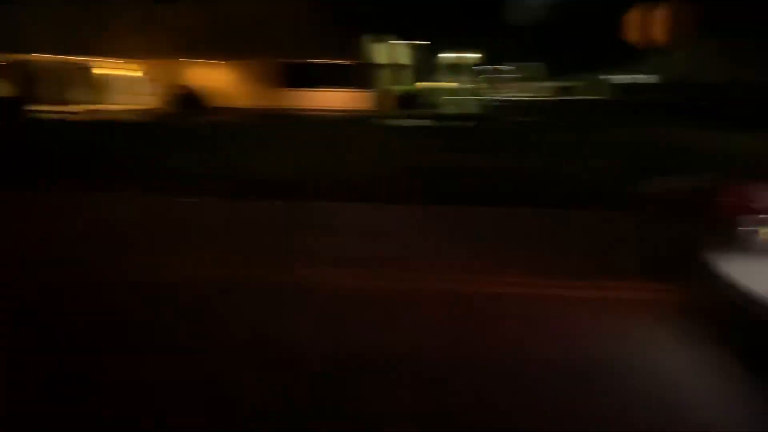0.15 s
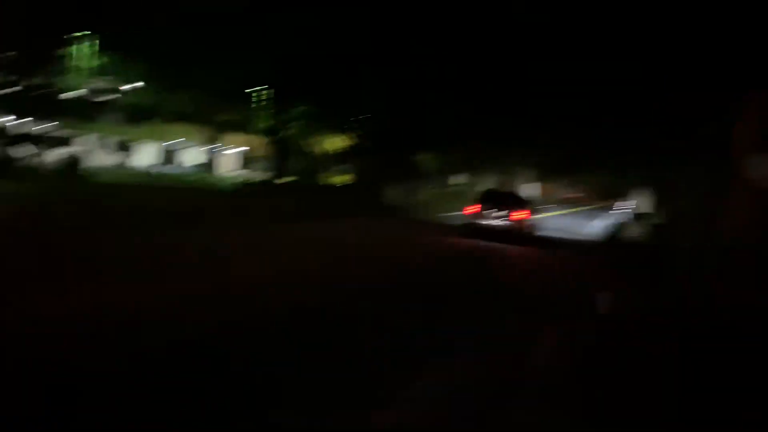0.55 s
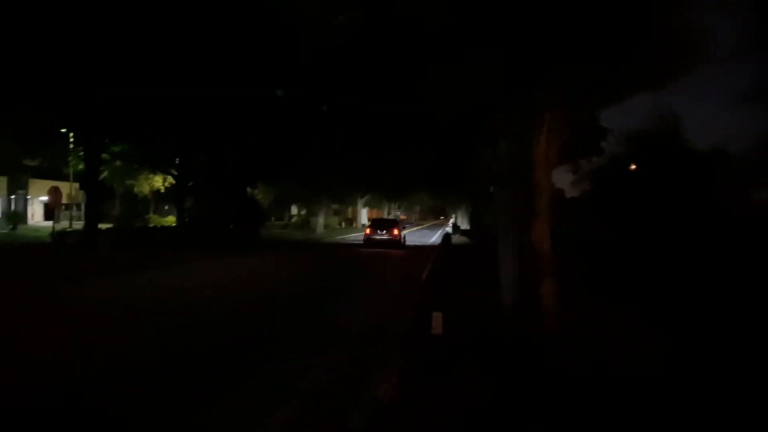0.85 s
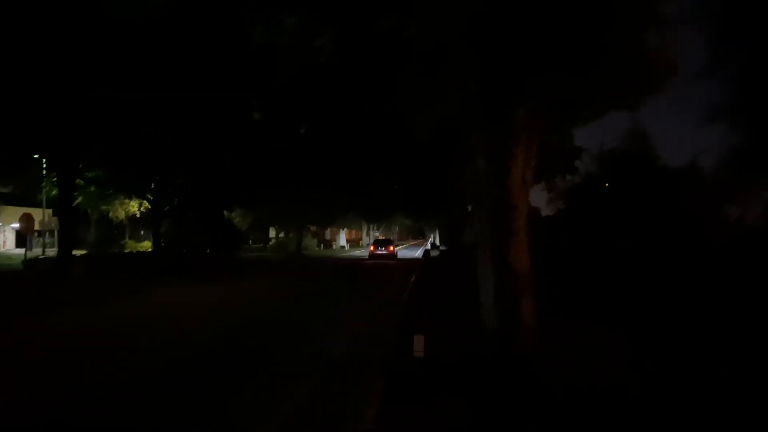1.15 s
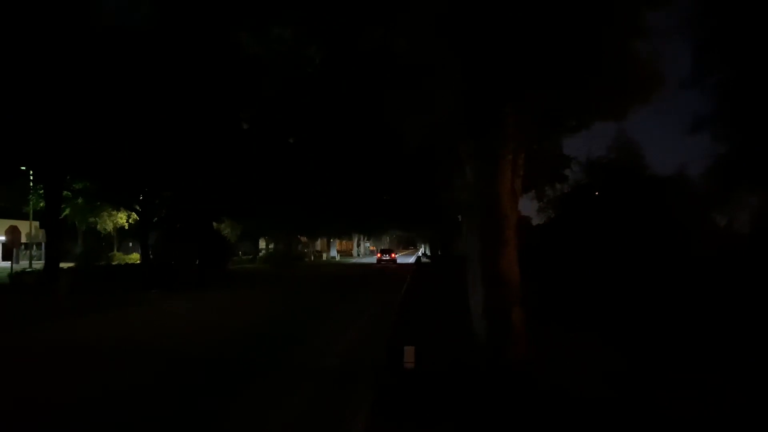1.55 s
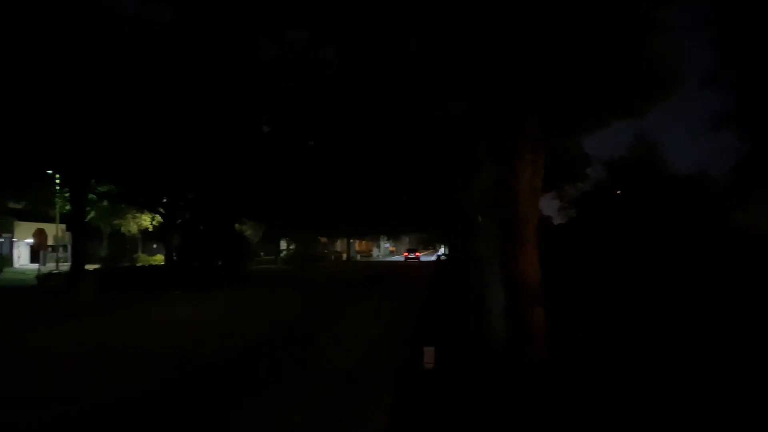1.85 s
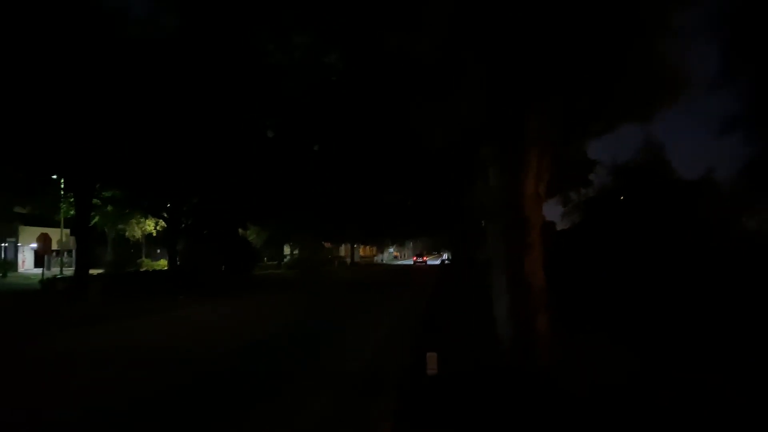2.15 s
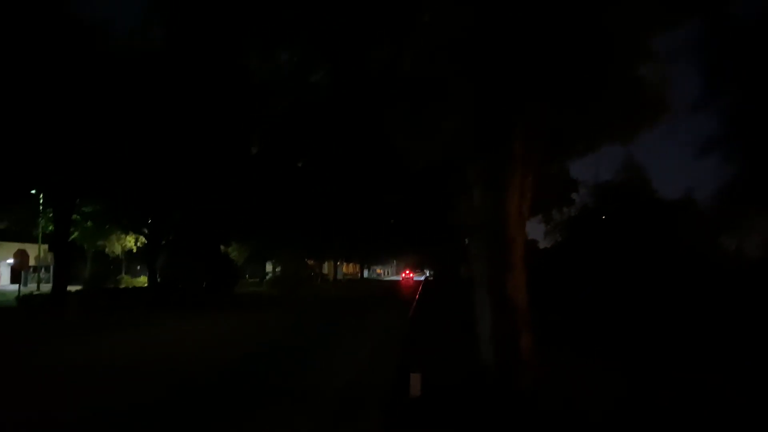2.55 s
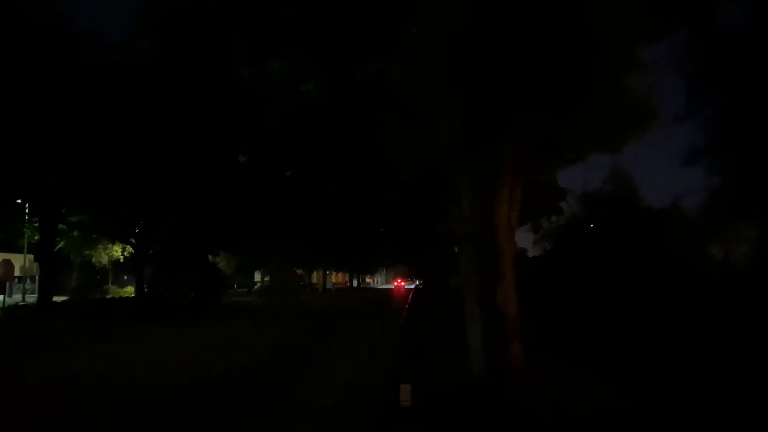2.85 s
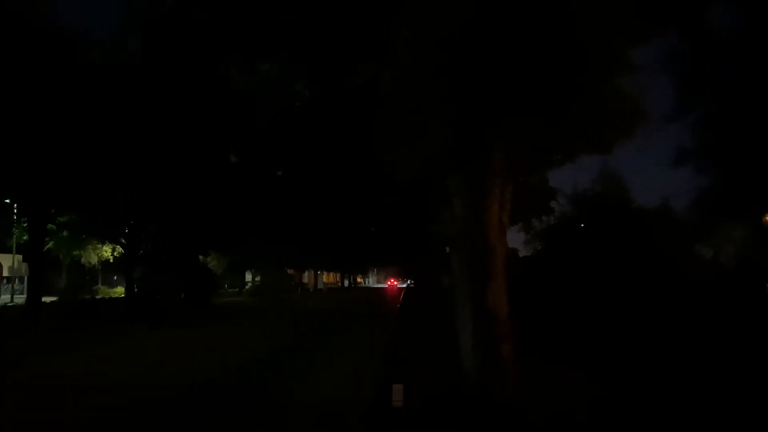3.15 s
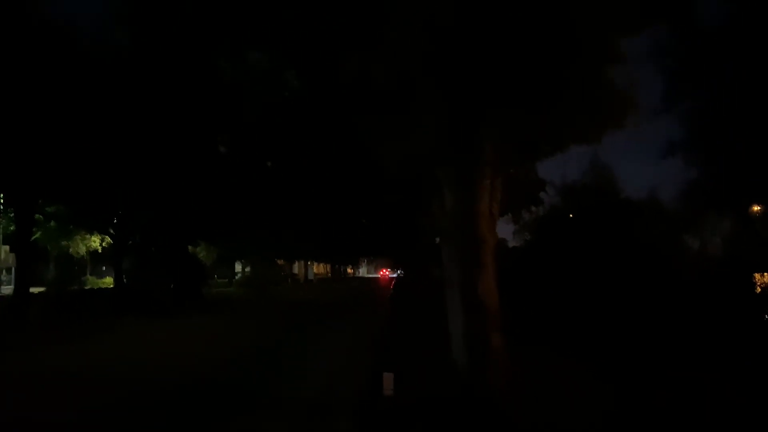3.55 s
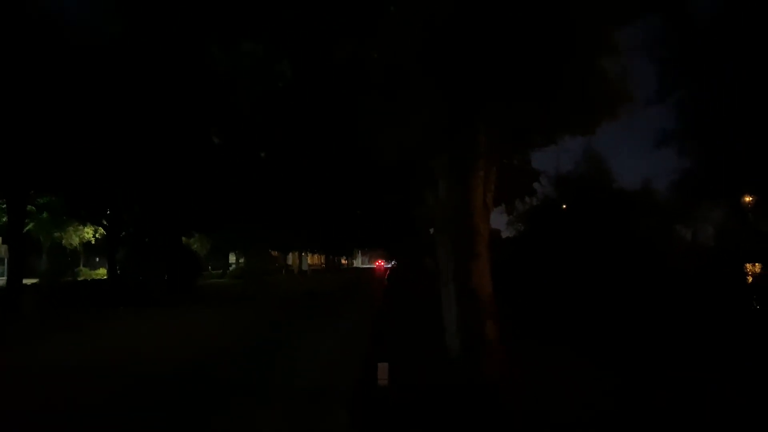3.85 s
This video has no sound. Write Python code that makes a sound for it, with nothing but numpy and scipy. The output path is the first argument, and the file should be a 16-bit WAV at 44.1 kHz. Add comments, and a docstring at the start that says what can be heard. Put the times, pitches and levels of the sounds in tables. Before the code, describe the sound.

Loud exhaust bark and drone burst past the listener at once, echo off house fronts, drop in pitch and pull away, then fall suddenly quieter as the driver lifts off, leaving distant hum outdoors.

```python
"""A four-cylinder car with a loud exhaust roars close past on a night road and drives off; the driver lifts off
the throttle twice. Harmonics of the firing rate make its drone, pulses through a resonant pipe its bark, and
noise gated by the firings its rasp, sizzle and crack. One cylinder barks harder than the others.
The road and house fronts answer with delayed copies and decaying noise. Shaped noise makes far traffic and the
car's wake; a wavering sine that swells and fades makes the cricket, another a faint far hum."""
import sys
import numpy as np
from scipy import signal
from scipy.fft import rfft, irfft, next_fast_len
from scipy.io import wavfile
from scipy.ndimage import uniform_filter1d, map_coordinates

SR = 44100
rng = np.random.default_rng(int(sys.argv[2]) if len(sys.argv) > 2 else 0)


def generate_wav(signal):
    """Clip the signal to [-1, 1] and save it as 16-bit WAV at the path in sys.argv[1]."""
    frames = np.transpose(np.atleast_2d(signal))
    scaled = np.clip(frames, -1, 1) * 32767
    pcm = np.round(scaled).astype(np.int16)
    wavfile.write(sys.argv[1], SR, pcm)


def gain_from_db(level_db):
    """Convert decibel levels to linear amplitude factors (20 dB per decade)."""
    decades = np.asarray(level_db, float) / 20
    return 10 ** decades


N = 176400
TIME_S = np.arange(N) / SR


def unit(x):
    """Normalisation to an rms of 1."""
    return x / np.sqrt(np.mean(x ** 2) + 1e-20)


def along(points, hz):
    """Spectral interpolation of (frequency, value) points on a logarithmic axis."""
    f, value = np.transpose(points)
    return np.interp(np.log(hz + 1), np.log(f + 1), value)


def curves(rows):
    """Linear interpolation in time: one value per sample for each column after the time."""
    seconds, *columns = np.transpose(rows)
    return [np.interp(TIME_S, seconds, column) for column in columns]


def wobble(rate):
    """Slow random modulation: a smooth curve through random knots, rate of them a second."""
    knots = rng.standard_normal(int(N * rate / SR) + 4)
    return map_coordinates(knots, [np.arange(N) * rate / SR])


def filtered(x, response):
    """Linear filtering: the spectrum of x times a complex response of frequency."""
    m = 2 * next_fast_len(N // 2 + SR // 4)
    return irfft(rfft(x, m) * response(np.fft.rfftfreq(m, 1 / SR)), m)[..., :N]


def causal(spectrum):
    """Minimum phase: folding the cepstrum forward lets a resonance ring only after its pulse."""
    def response(hz):
        cepstrum = irfft(np.log(gain_from_db(along(spectrum, hz)) + 1e-4))
        half = len(cepstrum) // 2
        cepstrum[1:half] *= 2
        cepstrum[half + 1:] = 0
        return np.exp(rfft(cepstrum))
    return response


def late(x, seconds):
    """Propagation delay: x heard later by a time that may change."""
    return map_coordinates(x, [np.arange(N) - seconds * SR], order=3, mode="nearest")


def rush(spectrum, patchy_db, gate=1):
    """Turbulent noise of rms 1: a shaped stereo spectrum with random patches in time and frequency."""
    # Likeness of left and right: (frequency [Hz], correlation [-1 to 1])
    alike = [(60, 0.92), (180, 0.94), (550, -0.61), (1650, 0.22), (4970, 0.028), (15000, -0.22)]
    z = signal.stft(gate * rng.standard_normal((2, N)), nperseg=512)[2]
    field = uniform_filter1d(rng.standard_normal(z.shape[1:]), size=3, axis=0)
    field = uniform_filter1d(field, size=14, axis=1)
    pair = signal.istft(z * gain_from_db(patchy_db * unit(field)), nperseg=512)[1][:, :N]

    def mid_side(hz):
        turn = np.arccos(np.clip(along(alike, hz), -1, 1)) / 2
        return gain_from_db(along(spectrum, hz)) * [np.cos(turn), np.sin(turn)]

    mid, side = filtered(pair, mid_side)
    return unit(np.array([mid + side, mid - side]))


def far_traffic():
    """Broadband noise: the far traffic is a steady, coloured hum."""
    # Colour of the far hum: (frequency [Hz], level [dB per Hz])
    night_spectrum = [(65, -28.5), (110, -4), (147, -3.5), (184, -10), (419, -15), (474, -4), (582, -20.5),
                      (658, -8.5), (1270, -22.5), (2670, -24.5), (7450, -53), (15000, -91)]
    return gain_from_db(-48.5 + 0.31 * wobble(4.4)) * rush(night_spectrum, patchy_db=1.5)


def wake():
    """Low-frequency turbulence: a deep rumble, first the car's wake, then far traffic."""
    # Strength of the rumble: (time [s], level [dB])
    wake_level = [(0.0, -48), (0.03, -58), (0.32, -47), (2.74, -52), (4.0, -46.5)]
    # Colour of the rumble: (frequency [Hz], level [dB per Hz])
    wake_spectrum = [(15, -62.5), (25, -24), (54, -0.5), (95, 4), (120, -16), (160, -25.5), (260, -120)]
    return gain_from_db(curves(wake_level)[0] + 1.5 * wobble(6.17)) * rush(wake_spectrum, patchy_db=0.0)


def cricket():
    """Amplitude modulation: half-sine swells cut chirps from a high tone of wavering phase."""
    # Chirps: (start [s], length [s], level [dB, relative])
    chirps = [(3.108, 0.017, -89), (3.377, 0.025, -86), (3.594, 0.03, -86), (3.633, 0.036, -84),
              (3.833, 0.1, -89.5)]
    chirp_gain_db, tone_hz = 9.5, 7300  # chirp_gain_db: loudness of all the chirps
    swell = sum(gain_from_db(db + chirp_gain_db) * np.sin(np.pi * np.clip((TIME_S - start) / length, 0, 1))
                for start, length, db in chirps)
    return swell * np.sin(2 * np.pi * tone_hz * TIME_S + 1.4 * wobble(40))


def far_hum():
    """Narrow-band tone: slow random level and phase blur a faint sine that comes in late."""
    start_s, tone_hz, level_db = 3.46, 482, -62
    level = gain_from_db(level_db + 2.4 * wobble(5.47)) * np.clip((TIME_S - start_s) / .15, 0, 1)
    return level * np.sin(2 * np.pi * tone_hz * TIME_S + 0.67 * wobble(12))


def night():
    """Superposition of the independent sounds around the road."""
    hum = far_traffic()
    rumble = wake()
    chirping = cricket()
    return hum + far_hum() + rumble + chirping


def street(x):
    """Diffuse reverberation: each frequency of the houses' answer dies at its own speed."""
    # Decay of the street: (frequency [Hz], time to fall by 60 dB [s])
    street_decay = [(150, 0.5), (1000, 0.34), (8000, 0.18)]
    shared = 0.24  # each side's share of the other's tail
    hz, t, z = signal.stft(rng.standard_normal((2, SR // 2)), SR, nperseg=256)
    z = z * gain_from_db(-60 * t / along(street_decay, hz)[:, None])
    tail = signal.istft(z, SR, nperseg=256)[1]
    answer = (tail + shared * tail[::-1]) / np.linalg.norm(tail[0])
    delayed = np.pad(x, (600, 0))[None]  # samples before the first answer
    return signal.fftconvolve(delayed, answer, axes=1)[:, :N]


def firings(count_up, sizes):
    """Impulse train: one pulse each time the running count of firings passes a whole number."""
    jitter_s, scatter_db = .00006, 0.9
    k = np.arange(np.ceil(count_up[0]), count_up[-1] - 1)
    luck = rng.standard_normal((len(k), 2))
    at = np.interp(k, count_up, np.arange(N)) + jitter_s * SR * luck[:, 0] + 1
    size = np.array(sizes)[k.astype(int) % 4] * gain_from_db(scatter_db * luck[:, 1])
    # a pulse between two samples is split over both
    i = np.clip(at.astype(int), 0, N - 2)
    return np.bincount(i, size * (1 - at + i), N) + np.bincount(i + 1, size * (at - i), N)


def engine_drone(count_up, levels_db):
    """Harmonic series: the regular firing sounds as multiples of its rate, each wavering in level."""
    # Harmonics: (multiple of the firing rate, phase after the firing [rad])
    harmonics = [(1, 0), (2, .9), (3, .6), (4, .6)]
    # Partials that sing out for a while: (multiple of the firing rate, start [s], end [s], rms level at the top [dB])
    overtones = [(7.75, 1.28, 1.577, -41), (2.75, 0.74, 3.92, -59), (4.75, 0, 0.14, -21),
                 (4.75, .2, 1.62, -37.5)]
    waver_db, rough_db = 0.82, 1  # slow wavering; quick flutter
    tone = 0
    for db, (k, rad) in zip(levels_db, harmonics):
        level = np.sqrt(2) * gain_from_db(db + waver_db * wobble(7.34) + rough_db * wobble(35))
        tone = tone + level * np.cos(2 * np.pi * k * count_up - rad)
    for k, start, end, db in overtones:
        swell = np.sqrt(np.abs(np.sin(np.pi * np.clip((TIME_S - start) / (end - start), 0, 1))))
        level = np.sqrt(2) * gain_from_db(db + 2.8 * wobble(6.56)) * swell
        # whole quarters of the firing rate: harmonics of the four-firing cycle
        tone = tone + level * np.cos(np.pi / 2 * round(4 * k) * count_up + 0.23 * wobble(25))
    return tone


def exhaust_bark(rate, count_up, pulses, hard, low_db, high_db):
    """Resonant dispersion: the pipe rings at each blow and lets the lows out later than the highs."""
    # Resonances of the pipe: (frequency [Hz], level [dB per Hz])
    pipe_spectrum = [(30, -26.5), (100, -29.5), (185, -13), (250, -11), (400, -11.5), (480, -6.5),
                     (560, -11.5), (700, -8), (810, -10.5), (950, -20), (1140, -15), (1350, -22.5),
                     (2200, -37.5), (3500, -65.5), (6000, -120)]
    cruise_hz, shared_below_hz = 147, 510  # firing rate once the car recedes; top of the shared part
    split_hz, chirp_s = 372, 0.00263  # low bark below, high bark above; lateness of the lowest lows
    even_share, even_until_s = 0.25, 0.12
    fade_s, fade_db_per_s = 3.4, 21

    # below shared_below_hz, what all cylinders share is the drone
    even = firings(count_up, np.ones(4) / 4)
    excess = hard - filtered(even, lambda f: 1 / (1 + (f / shared_below_hz) ** 8))
    # seen from the front, all cylinders bark
    blows = excess + even_share * pulses / (1 + (TIME_S / even_until_s) ** 6)

    def pipe(x, shift):
        def response(f):
            dispersion = np.exp(-2j * np.pi * chirp_s * split_hz * np.log(1 + f / split_hz))
            return causal(pipe_spectrum)(f / shift) * dispersion
        return filtered(x, response)

    # the approach raises the pipe's resonances too
    coming = np.clip((rate - cruise_hz) / (rate[0] - cruise_hz), 0, 1)
    bark = pipe(blows * coming, rate[0] / cruise_hz) + pipe(blows * (1 - coming), 0.98)
    low = filtered(bark, lambda f: 1 / (1 + (f / split_hz) ** 6))
    bark = gain_from_db(low_db) * unit(low) + gain_from_db(high_db) * unit(bark - low)
    # from fade_s the bark dies away and leaves the drone
    return bark * gain_from_db(-fade_db_per_s * np.clip(TIME_S - fade_s, 0, 1))


def exhaust_noise(pulses, hard, rasp_db, sizzle_db):
    """Modulated turbulence: every firing puffs noise, and the hard cylinder adds a sharp crack."""
    # Colours of the rasp, the sizzle above it and the crack: (frequency [Hz], level [dB per Hz])
    rasp_spectrum = [(530, -30.5), (900, -3.5), (1060, -11), (1320, 0), (1590, -6.5), (1760, -3.5),
                     (2000, -10.5), (2500, -9.5), (2840, -13.5), (3600, -20), (4680, -38), (7920, -120)]
    sizzle_spectrum = [(1470, -32), (2500, -14), (4420, -11.5), (6430, -18), (7470, -27.5), (10100, -27.5),
                       (12200, -42), (13500, -29.5), (15000, -41)]
    crack_spectrum = [(1200, -7.5), (2500, -2.5), (3400, -13.5), (4700, -8.5), (6500, -25), (10000, -29),
                      (15000, -42.5)]
    # Crack, strongest while the tail pipe points at the listener: (time [s], level [dB])
    crack_level = [(.1, -38.5), (.19, -36.5), (.22, -23.5), (.3, -38), (.42, -42.5), (.8, -100)]
    puff_s, crack_s = 0.0013, 0.00061  # time constants
    rasp_gated, sizzle_gated = 0.25, 0.23  # share of the gate that follows the puffs
    puffs = unit(filtered(pulses, lambda f: 1 / (1 + 2j * np.pi * f * puff_s) ** 2))
    rasp = rush(rasp_spectrum, 3.6, 1 - rasp_gated + rasp_gated * puffs)
    sizzle = rush(sizzle_spectrum, 2.6, 1 - sizzle_gated + sizzle_gated * puffs)
    snap = unit(filtered(hard, lambda f: 1 / (1 + 2j * np.pi * f * crack_s) ** 2))
    crack = rush(crack_spectrum, 1.9, snap)
    return gain_from_db(rasp_db) * rasp + gain_from_db(sizzle_db) * sizzle + gain_from_db(curves(crack_level)[0]) * crack


def reflections(point, gone, nearest_m, metres):
    """Image sources: the road and the house fronts return copies, late by their longer paths."""
    # Fronts along the road: (distance from the lane [m], negative on the listener's side, level [dB])
    walls = [(6.5, -8.5), (-9.5, -14.5)]
    pipe_height_m, ear_height_m, ground = 0.335, 1.54, 0.34  # ground: reflection factor of the road
    echoes = ground * late(point, 2 * pipe_height_m * ear_height_m / metres / 343)
    for wall, db in walls:
        path = np.hypot(2 * abs(wall) + np.sign(wall) * nearest_m, gone)
        echoes = echoes + gain_from_db(db) * metres / path * late(point, (path - metres) / 343)
    return echoes


def car():
    """A compact source in motion: drone, bark with echoes, and noise that spreads out with distance."""
    # Firings as heard, the fall of pitch in passing included: (time [s], rate [firings per second])
    firing_rate = [(0, 174.6), (.08, 171.6), (.12, 166), (.18, 154), (.23, 148.9), (.32, 146.1),
                   (.45, 145.6), (.7, 146.4), (1.46, 149.4), (1.6, 142.6), (1.67, 144), (1.73, 149.2),
                   (1.95, 146.8), (2.5, 145.1), (3.3, 140.8), (3.6, 138), (4, 137)]
    # Levels in three parts, passing, pulling away, coasting: (time [s], drone at 1, 2, 3 and 4 times
    # the firing rate [dB], low bark [dB], high bark [dB], rasp [dB], sizzle [dB])
    car_levels = [
        [(0.0, -19, -20.5, -25.5, -30, -25.5, -17.5, -18, -25),
         (0.08, -22, -20, -25.5, -25.5, -23.5, -22.5, -40, -39),
         (0.13, -17.5, -21, -17.5, -23.5, -25.5, -22, -17.5, -34.5),
         (0.2, -24.5, -20, -20.5, -36, -31, -17, -30, -37.5),
         (0.26, -23.5, -23, -20, -46, -28, -20.5, -49, -40),
         (0.45, -28.5, -30.5, -23, -49, -38, -29.5, -34.5, -50.5)],
        [(0.64, -25.5, -30, -31, -30.5, -36, -31, -36.5, -47),
         (0.82, -26.5, -32.5, -39, -34, -36.5, -37.5, -37, -48.5),
         (1.02, -28.5, -34.5, -36.5, -42, -38, -37.5, -39, -50.5),
         (1.46, -31.5, -31.5, -32, -31.5, -38, -36.5, -40.5, -53),
         (1.57, -28.5, -34, -32, -38.5, -37.5, -36.5, -40, -49)],
        [(1.63, -46, -56, -47, -68, -50, -62, -46, -58.5), (1.7, -38, -56, -53, -62, -49, -57, -46.5, -58),
         (1.86, -40, -46.5, -43, -61, -53.5, -63, -49.5, -61), (2.7, -42, -47, -49.5, -73, -58, -81, -52, -73),
         (3.36, -47, -52.5, -55, -82, -61, -82, -59.5, -80),
         (3.5, -57.5, -66.5, -68, -82, -74, -65.5, -56.5, -86), (4, -48.5, -70, -67, -79, -76, -74, -57.5, -89)],
    ]
    # Size of each cylinder's puff of noise, in firing order: (size [relative])
    cylinders = [0.99, 0.83, 0.21, 0.53]
    bark_at_s = .5197  # one firing of the hard cylinder
    pass_s, nearest_m, speed_m_s = 0.1022, 2.055, 32
    direct_m = 3.2  # at this distance half the noise power comes from one point

    rate, = curves(firing_rate)
    *drone_db, low_db, high_db, rasp_db, sizzle_db = curves(np.vstack(car_levels))
    count_up = np.cumsum(rate) / SR
    count_up = count_up - np.interp(bark_at_s * SR, np.arange(N), count_up)
    drone = engine_drone(count_up, drone_db)
    pulses = firings(count_up, cylinders)
    hard = firings(count_up, np.eye(4)[0])
    bark = exhaust_bark(rate, count_up, pulses, hard, low_db, high_db)
    noise = exhaust_noise(pulses, hard, rasp_db, sizzle_db)

    gone = speed_m_s * (TIME_S - pass_s)
    metres = np.hypot(nearest_m, gone)
    direct = 1 / (1 + (metres / direct_m) ** 2)
    point = bark + np.sqrt(direct) * noise[0]
    barks = point + reflections(point, gone, nearest_m, metres)
    return drone, barks, np.sqrt(1 - direct) * noise


def scene():
    """Interaural time and level differences carry the car across the two microphones."""
    # Bearing of the car: (time [s], side [-1 left to 1 right])
    bearing = [(0, -.5), (.1, 0), (.19, 1), (.42, 1), (.54, -.15), (4, -.15)]
    ear_lag_s, ear_shade_db, right_db = 0.00042, 1.5, 1.3  # right_db: right over left, whole scene
    street_db, drone_wet = -7, 0.2  # drone_wet: share of the drone that the houses answer
    drone, barks, noise = car()
    tone = drone + barks
    side, = curves(bearing)
    ears = np.array([late(tone, ear_lag_s * side / 2), late(tone, -ear_lag_s * side / 2)])
    shade = gain_from_db(np.outer([-1, 1], ear_shade_db * side))
    passing = ears * shade ** 0.63 + noise * shade
    answer = gain_from_db(street_db) * street(barks + drone_wet * drone)
    return (passing + answer + night()) * gain_from_db([[-right_db / 2], [right_db / 2]])


def low_pass(x):
    """Removes everything above the highest recorded frequency."""
    return signal.sosfilt(signal.butter(12, 15690, fs=SR, output="sos"), x)


def record(dry):
    """Band limits and saturation: the microphones lose the deepest bass and round off peaks."""
    low_hz, clip_top = 33.5, 0.88  # clip_top: ceiling that the peaks approach
    x = filtered(dry, lambda f: 1 / (1 + (low_hz / (f + 1)) ** 4))
    mix = x / (1 + (x / clip_top) ** 4) ** (1 / 4)
    return low_pass(mix)


dry = scene()
out = record(dry)
generate_wav(out)
```